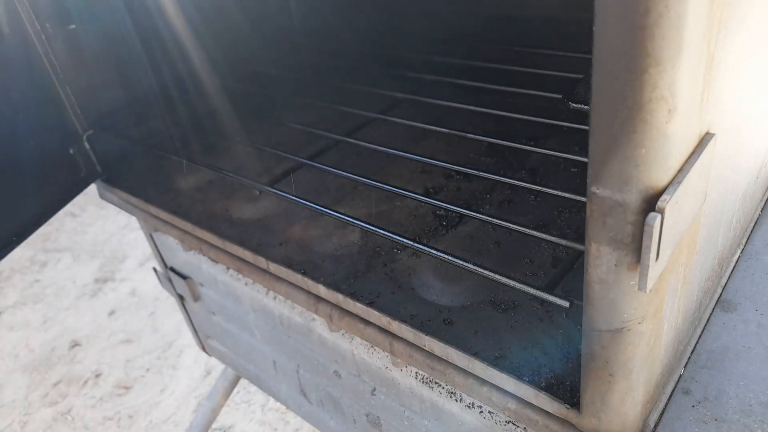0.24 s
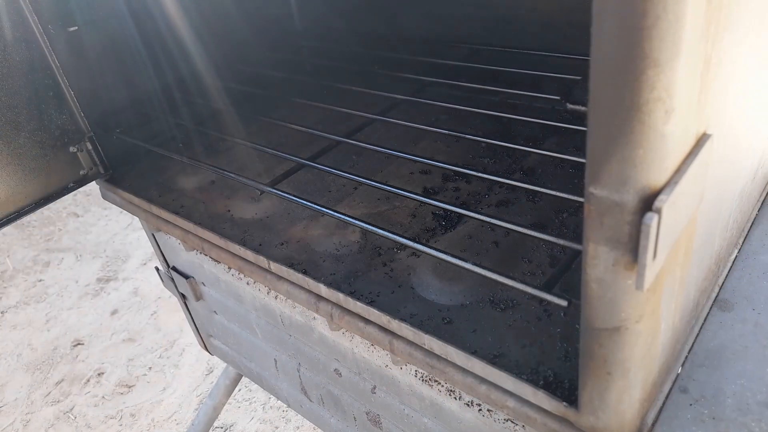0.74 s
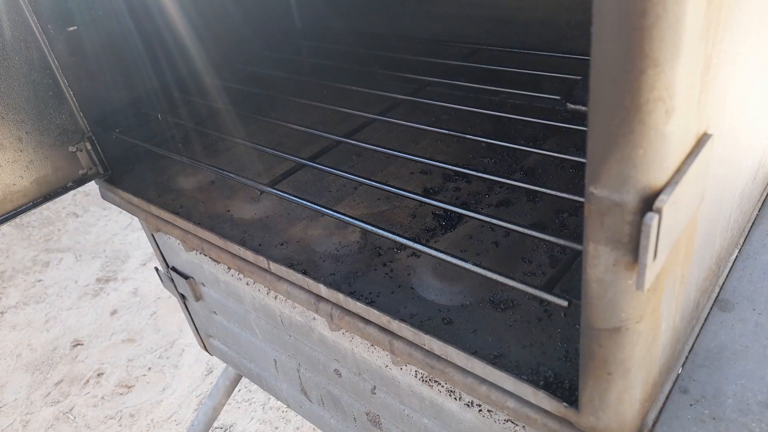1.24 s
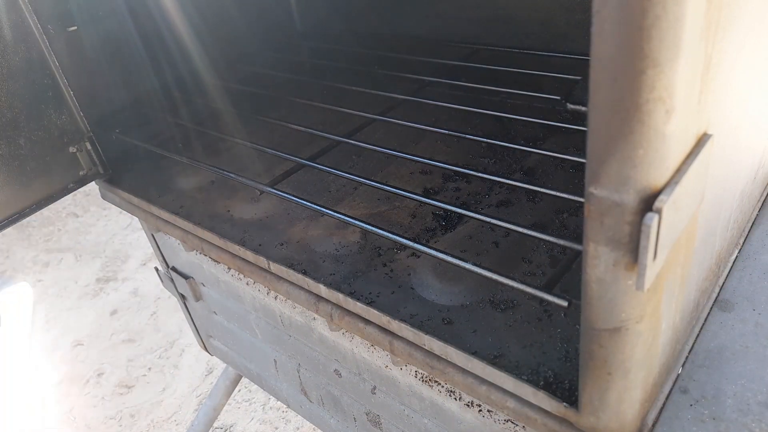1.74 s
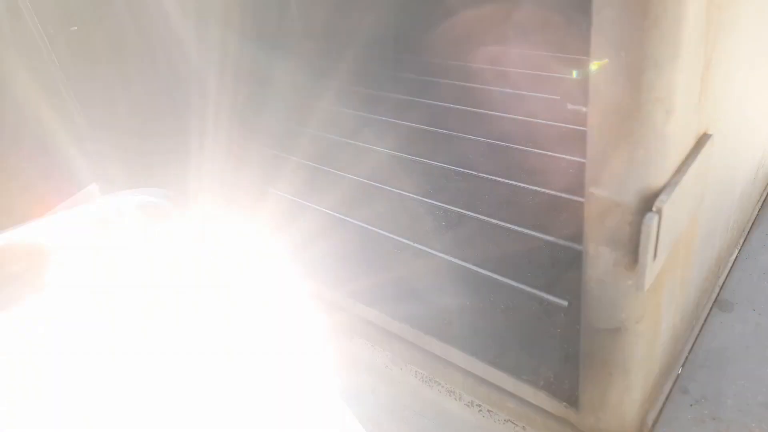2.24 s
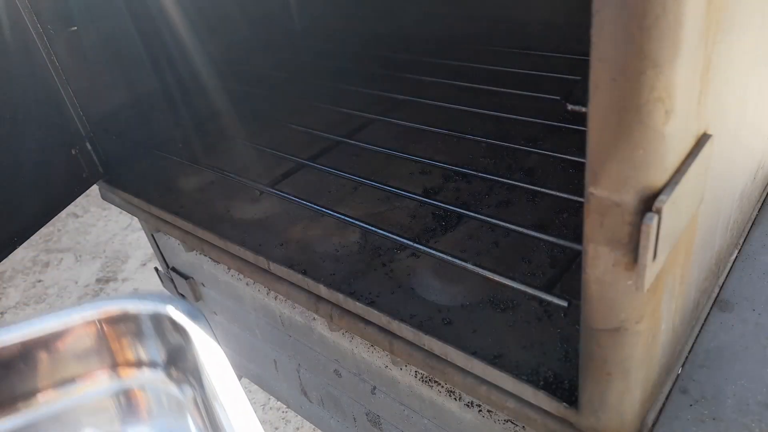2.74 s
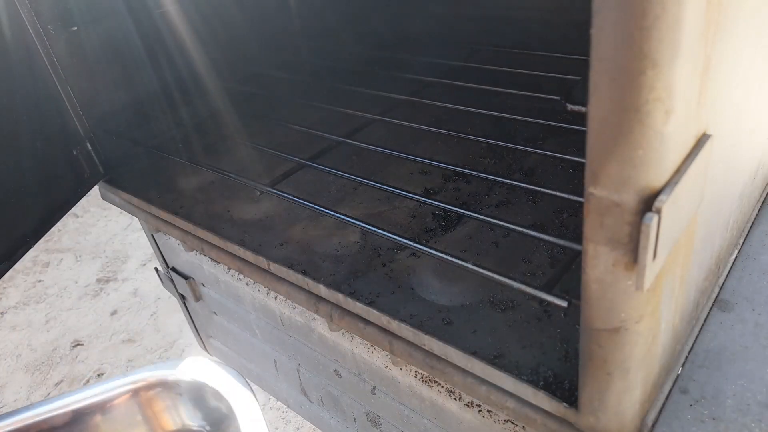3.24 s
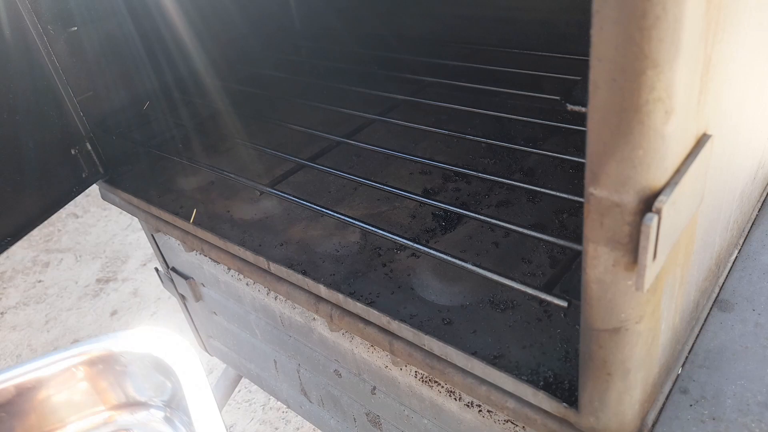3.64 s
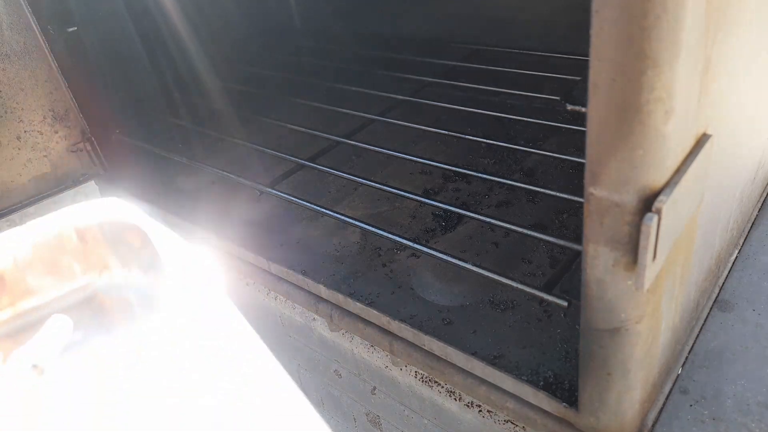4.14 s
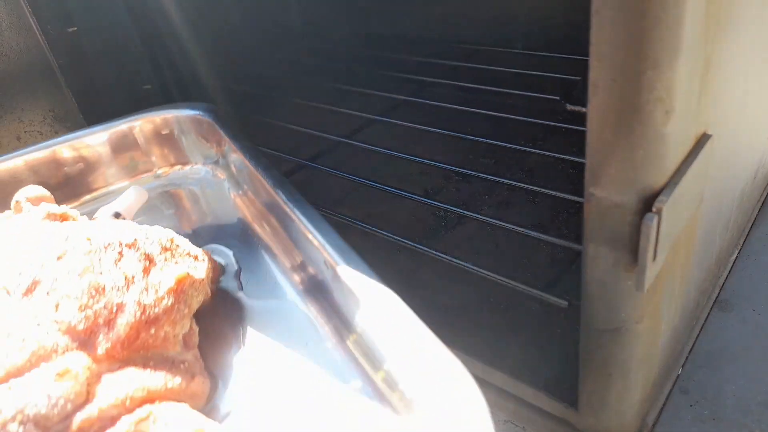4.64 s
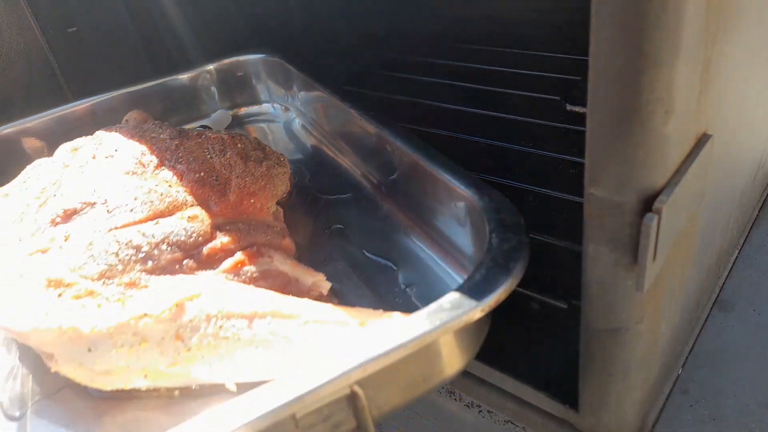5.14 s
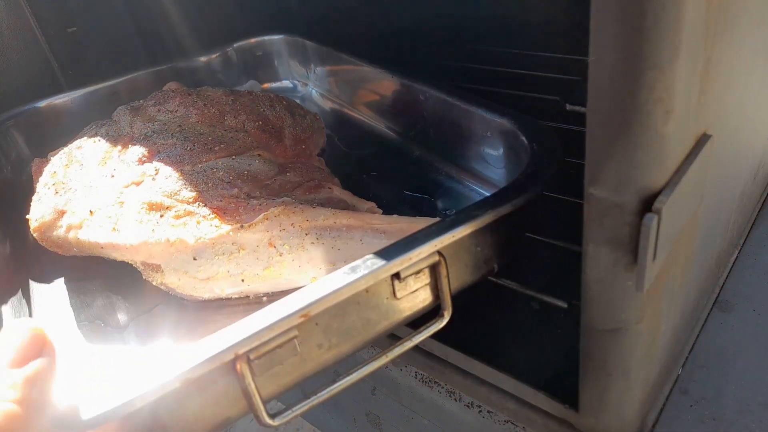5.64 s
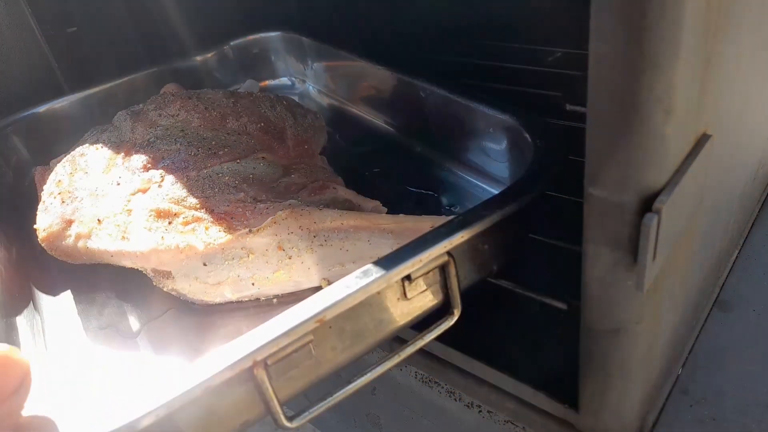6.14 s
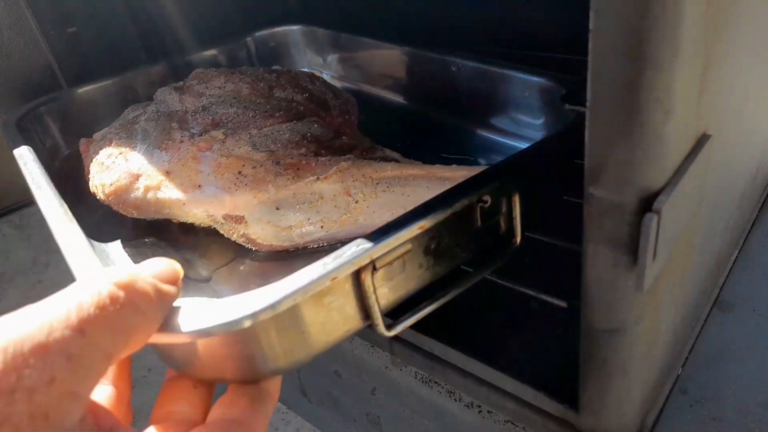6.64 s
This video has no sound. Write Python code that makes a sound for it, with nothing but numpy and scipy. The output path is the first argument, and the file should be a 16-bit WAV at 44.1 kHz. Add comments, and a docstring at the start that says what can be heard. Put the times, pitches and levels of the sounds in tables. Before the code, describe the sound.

Hollow metal knocks, sharp tray clacks and small handle tinks lead to grainy steel scraping and heavy tray bumps in quiet open air.

```python
"""Meat tray into a smoker

Outdoors, a steel tray of meat is carried to a sheet-steel smoker, rubs its way in, lands on the rack and slides.
Knocks, short scrapes, clacks, tinks and landings are ringing modes over bands of noise; wires ring as paired tones.
Rubbing is slipping noise in the tray's resonances; rustles, wind, open air and a far buzz are shaped noise.
Jolts and dull bumps reach the microphone, and a bird whistles in wavering sines some way off."""
import sys
import numpy as np
from scipy import signal
from scipy.fft import irfft, next_fast_len
from scipy.io import wavfile

SR = 44100
rng = np.random.default_rng(int(sys.argv[2]) if len(sys.argv) > 2 else 0)


def generate_wav(signal):
    """Clip the signal to [-1, 1] and save it as 16-bit WAV at the path in sys.argv[1]."""
    frames = np.transpose(np.atleast_2d(signal))
    scaled = np.clip(frames, -1, 1) * 32767
    pcm = np.round(scaled).astype(np.int16)
    wavfile.write(sys.argv[1], SR, pcm)


N = 303408
TIME = np.arange(N) / SR


def amp(db):
    """Decibels to gain."""
    return 10 ** (np.asarray(db) / 20)


def unit(x):
    """Scales to rms 1."""
    return x / np.sqrt(np.mean(x ** 2) + 1e-30)


def read(points, hz, axis=1):
    """One column of a table, interpolated over log frequency."""
    table = np.transpose(points)
    return np.interp(np.log(hz + 1), np.log(table[0]), table[axis])


def add(mix, s, sound):
    """Mixes a stereo sound in at time s."""
    part = mix[:, max(0, round(s * SR)):][:, :sound.shape[1]]
    part += sound[:, :part.shape[1]]


def wander(length, hz):
    """Random motion of rms 1: straight lines between random points, hz points per second."""
    knots = rng.standard_normal(4096)
    return unit(np.interp(np.arange(length) * hz / SR, np.arange(len(knots)), knots, period=len(knots)))


def together(gains):
    """Unrelated noises add in power."""
    return np.sqrt(sum(gain ** 2 for gain in gains))


def swell(s, rise, hold, fall_db_per_s):
    """Gain over time of one movement: grows by 20 dB in the rise time up to s, holds, then fades."""
    early = np.maximum(s - TIME, 0)
    late = np.maximum(TIME - s - hold, 0)
    return amp(np.maximum(-20 * early / abs(rise) - abs(fall_db_per_s) * late, -200))


# Left-over-right level of every source, before its own pan: (frequency [Hz], left minus right [dB])
LEFT_BIAS = [(130, 3), (270, -1), (550, 3), (1200, 3.5), (3000, 3), (12000, 2.5)]


def ports(hz, lag_ms, pan_db=0):
    """Complex gain at the two microphone ports: the right one hears later, by level and pan softer or louder."""
    tilt = amp(read(LEFT_BIAS, hz) + pan_db)
    delay = np.exp(-2j * np.pi * hz * lag_ms * 1e-3)
    return np.array([tilt, delay]) / np.sqrt((1 + tilt ** 2) / 2)


# How alike the two ports hear a noise, before its own factor: (frequency [Hz], correlation [0 to 1])
LIKENESS = [(50, .7), (130, 0.86), (300, 0.96), (700, .92), (2000, 0.41), (15000, 0.31)]


def random_spectrum(length, lag_ms, pan_db=0, alike=1):
    """Frequencies and a white, random-phase spectrum as the two ports hear it."""
    hz = np.fft.rfftfreq(length, 1 / SR)
    a, b = np.exp(2j * np.pi * rng.random((2, len(hz))))
    same = np.clip(alike * read(LIKENESS, hz), 0, 1)
    pair = np.array([a, same * a + np.sqrt(1 - same ** 2) * b])
    return hz, pair * ports(hz, lag_ms, pan_db)


def noise(tone, lag_ms, pan_db=0, alike=1):
    """Steady stereo noise of rms 1 with the given spectrum."""
    length = next_fast_len(N)
    hz, z = random_spectrum(length, lag_ms, pan_db, alike)
    return unit(irfft(z * amp(read(tone, hz)), length)[:, :N])


def envelope(t, hz, t60, rise, contact, build_cycles, snap_db, snap_s):
    """A mode builds over a few cycles, is fed while the contact lasts, then dies away."""
    build = 1 - np.exp(-t / (abs(rise) / 2 + build_cycles / hz[:, None]))
    ringing = build * np.exp(-np.log(1000) * np.maximum(t - contact, 0) / t60[:, None])
    # the first snap comes straight from the point of impact and has little bass
    snap = amp(snap_db) * (1 - np.exp(-t / (abs(rise) / 2 + 1e-5))) * np.exp(-t / snap_s)
    return ringing + snap * (hz / (hz + 250))[:, None]


# Pitches at which a blow's tone is set, boom, body, edge, fizz: (frequency [Hz])
TONE_HZ = [240, 700, 2700, 9600]


def tone_of(shape, db, brightness):
    """Levels of one blow: the harder the contact, the more the tone tilts toward the treble."""
    octaves = np.log2(np.array(TONE_HZ) / TONE_HZ[1])
    return db + np.array(shape) + brightness * octaves


def strike(tone_db, rise, contact, modes, ring, lag_ms, pan_db, build_cycles, snap_db, snap_s,
           ripple_db, chatter_db, size):
    """One blow on steel: clear modes over a dense ring in third octaves, roughened by chatter at the contact."""
    t = np.arange(size) / SR
    tone = list(zip(TONE_HZ, tone_db))
    timing = rise, contact, build_cycles, snap_db, snap_s
    centres = 1000 * 2 ** (np.arange(-10, 13) / 3)
    hz, z = random_spectrum(size, lag_ms, pan_db)

    # the weak modes bunch into peaks and gaps
    ripple = amp(ripple_db * np.clip(wander(len(hz), SR / 14), -2, 2))
    share = ripple * (abs(np.log2((hz + 1) / centres[:, None])) < 1 / 6)
    band_norm = size / np.sqrt(6 * (share ** 2).sum(1))
    bands = irfft(z[:, None] * share, size) * band_norm[:, None]
    shape = envelope(t, centres, read(ring, centres, axis=2), *timing)
    band_gain = amp(read(tone, centres) + read(ring, centres))
    crowd = np.einsum("cbt,bt->ct", bands, shape * band_gain[:, None])
    crowd *= unit(amp(chatter_db * wander(size, 700)))

    mode_hz, mode_db, t60 = np.transpose(modes)
    # where the blow lands decides how strongly each mode answers
    spread_db = rng.uniform(-2, 2, len(modes))
    height = np.sqrt(2) * amp(read(tone, mode_hz) + mode_db + spread_db)
    turn = np.exp(2j * np.pi * (mode_hz[:, None] * t + rng.random((len(modes), 1))))
    clear = (ports(mode_hz, lag_ms, pan_db) * height) @ (turn * envelope(t, mode_hz, t60, *timing))
    return crowd + clear.real


# Knocks on the cabinet, and two short scrapes that build slowly (at 0.904 and 1.128 s):
# (time [s], relative level [dB], brightness [dB/octave], rise [s], contact [s])
CABINET_CONTACTS = [(0, -49.5, -3, 0.00095, 0.02), (.205, -67, -8, 0.0037, 0.014),
                    (.338, -53.5, -1.5, 0.0021, 0.015), (.365, -57, -3.5, 0.0018, 0.01),
                    (0.904, -58, -4, 0.041, 0.076), (1.128, -57, -4, 0.023, 0.085),
                    (1.369, -40.5, -0.5, 0.012, 0.0074), (2.087, -43.5, -0.76, 0.017, 0.012),
                    (2.587, -44, -0.4, 0.004, 0.024), (2.656, -45.5, 0.3, 0.0013, 0.012),
                    (3.038, -36.5, -3.5, .0009, 0.015), (3.159, -42, -1.3, .0012, 0.036),
                    (3.558, -66.5, -9.5, .0066, .02), (4.857, -50.5, -6.5, .0054, 0.025)]
# The tone the box gives a contact at boom, body, edge, fizz: (relative level [dB])
CABINET_TONE = [0, 0.00093, 0.97, -1.6]
# Modes that stand out of the box's ring: (frequency [Hz], level against the contact's tone [dB], t60 [s])
CABINET_MODES = [(122.8, -5.5, 0.57), (180.6, -4, 0.2), (207.6, -3, 0.1), (267.8, 0, 0.16), (324, -2, .4),
                 (344, -9.5, 0.15), (427.4, -11.5, 0.19), (459, -15, 0.83), (487.6, -7.5, 0.36),
                 (622, -16.5, 0.29), (698, -13, 0.51), (764, -11, 0.27), (832, -9, 0.65),
                 (1126, -10.5, 0.35), (1350, -17, .25), (1840, -16, 0.2), (1914, -14, 0.12),
                 (2100, -15.5, 0.35)]
# Its crowd of weaker modes: (frequency [Hz], level against the contact's tone [dB], t60 [s])
CABINET_RING = [(101, -14, 0.72), (190, -1, 0.71), (400, -3, 0.48), (544, -7.5, 0.47), (770, -2, 0.43),
                (1400, -2.5, 0.32), (2430, -3.5, 0.25), (5370, -3, 0.17), (8450, -8, 0.14),
                (15000, -22, 0.48)]


def cabinet():
    """The big sheet-steel box booms under knocks and short scrapes; its bass takes some milliseconds to build."""
    out = np.zeros((2, N))
    for s, db, brightness, rise, contact in CABINET_CONTACTS:
        tone_db = tone_of(CABINET_TONE, db, brightness)
        boom = strike(tone_db, rise, contact, CABINET_MODES, CABINET_RING, lag_ms=0.35, pan_db=0,
                      build_cycles=5.4, snap_db=-2, snap_s=0.011, ripple_db=4.5, chatter_db=0.0, size=32768)
        add(out, s, boom)
    return amp(-0.18) * out


# Rack wires and panels left singing by a knock, and one short scrape squeak (at 3.163 s):
# (time [s], frequency [Hz], level before its twin [dB], t60 [s])
SINGING_STEEL = [(0, 246.5, -35.5, 0.18), (0, 1440, -55, 0.57), (0, 2320, -65, 0.63), (1.37, 885, -70, .5),
                 (1.37, 2113, -44, 0.14), (1.372, 4380, -33, 0.061), (1.368, 5470, -34, 0.053),
                 (2.092, 881, -50, 0.99), (2.091, 1132, -47.5, 0.28), (2.092, 2170, -74, 1.1),
                 (2.587, 895, -52, 0.64), (3.04, 1089, -33.5, 0.13), (3.045, 211.6, -30.5, 0.62),
                 (3.163, 3160, -43, 0.25), (3.268, 482, -47.5, 0.45)]


def wires():
    """Each rings as a dying tone with a weak twin a few Hz away, so that it fades unevenly."""
    out = np.zeros((2, N))
    t = np.arange(int(1.5 * SR)) / SR
    for s, hz, db, t60 in SINGING_STEEL:
        twin = 1 + .25 * np.exp(2j * np.pi * (rng.uniform(5, 12) * t + rng.random()))
        decay = amp(db - 60 * t / t60) * (1 - np.exp(-t / 0.0042))
        tone = decay * np.exp(2j * np.pi * (hz * t + rng.random())) * twin
        add(out, s, np.sqrt(2) * (ports(hz, lag_ms=0.1)[:, None] * tone).real)
    return out


# Gusts at the microphone: (time at full strength [s], rise by 20 dB [s], hold [s], level before lumps [dB])
GUSTS = [(0, .1, 0.33, -51), (.93, 0.074, .04, -66), (2.359, .04, .02, -51), (3.7, .1, .35, -60.5),
         (4.899, 0.37, 0.7, -56.5), (5.818, 0.092, 0.34, -58.5), (6.099, 0.14, .6, -52.5)]
# Spectrum of the wind and jolts: (frequency [Hz], relative level [dB])
WIND_TONE = [(15, -37.5), (30, -19.5), (60, 0.5), (100, -1.5), (140, -14), (250, -25), (600, -53.5),
             (2000, -92)]
GUST_FALL_DB_PER_S, CALM_DB = 130.5, -75
LUMP_DB, LUMPS_PER_S = 3, 12
# each cabinet contact and landing also jolts the microphone, a low thump this far below and behind the blow
JOLT_DB, JOLT_DELAY_S = -11.5, 0.027
JOLT_RISE_S, JOLT_HOLD_S, JOLT_FALL_DB_PER_S = .035, .014, 130


def wind_and_jolts():
    """Lumpy wind, and the microphone jolted by each contact and landing: low noise, stronger at the left port."""
    gusts = [amp(db) * swell(s, rise, hold, GUST_FALL_DB_PER_S) for s, rise, hold, db in GUSTS]
    lumps = unit(amp(LUMP_DB * wander(N, LUMPS_PER_S)))
    breeze = together(gusts + [amp(CALM_DB)]) * lumps
    jolts = [amp(db + JOLT_DB) * swell(s + JOLT_DELAY_S, JOLT_RISE_S, JOLT_HOLD_S, JOLT_FALL_DB_PER_S)
             for s, db, *_ in CABINET_CONTACTS + RACK_LANDINGS]
    return together([breeze] + jolts) * noise(WIND_TONE, lag_ms=.1, pan_db=7, alike=0.65)


# Spectrum of the quiet open air: (frequency [Hz], relative level [dB])
AIR_TONE = [(35, -23.5), (60, 1.5), (231, -3), (335, 2.5), (521, -9.5), (1200, -22.5), (2150, -15.5),
            (3580, -26), (4960, -21), (7540, -24.5), (15500, -25)]
AIR_DB = -70.5


def open_air():
    """The quiet outdoors as a steady, wide bed of noise."""
    return amp(AIR_DB) * noise(AIR_TONE, lag_ms=0.055, pan_db=0.5, alike=0.3)


# Hands and sleeves shift: (time at full strength [s], rise by 20 dB [s], hold [s], relative level [dB])
HAND_MOVES = [(0.063, 0.22, 0.23, -64.5), (0.996, .3, 1.5, -75), (3.466, 0.58, 0.036, -76),
              (3.95, .4, 0.47, -73), (5.616, 0.22, 0.13, -68.5), (6.062, 0.29, 0.41, -69.5)]
# Spectrum of the rustle: (frequency [Hz], relative level [dB])
RUSTLE_TONE = [(1500, -4), (3500, -7), (5400, -2), (7000, -4.5), (10000, -3.5), (13000, -0.5),
               (15500, -3.5)]
RUSTLE_FALL_DB_PER_S = 41.5


def rustle(hiss_gain):
    """Fine, crinkly hiss of hands, sleeves and the sliding tray: bright noise with a fast grain."""
    hands = [amp(db) * swell(s, rise, hold, RUSTLE_FALL_DB_PER_S) for s, rise, hold, db in HAND_MOVES]
    grain = unit(amp(0.61 * wander(N, 900) + 0.28 * wander(N, 40)))
    hiss = noise(RUSTLE_TONE, lag_ms=0.18, pan_db=1.0, alike=0.36)
    return amp(5.5) * together(hands + [hiss_gain]) * hiss * grain


# Short metal clacks of the tray and its wire handles; the rows at 3.039 and 3.158 s add the bright snap of the
# cabinet knocks there: (time [s], relative level [dB], brightness [dB/octave], relative left-right pan [dB])
TRAY_CLACKS = [(.075, -67.5, 3, 0), (1.011, -48.5, -2, 6), (1.37, -45, 0, 19), (1.737, -52.5, -11.5, 5),
               (2.3517, -28.5, 2.83, 6.5), (2.463, -65, 1.4, -6), (2.641, -36, -5, 5),
               (2.783, -35.5, -3.5, 4.5), (3.039, -54, 1.5, 2), (3.158, -50, 1.5, 1), (3.268, -36, -4.6, 1),
               (3.645, -57.5, -0.7, 1), (4.444, -75.5, 3.5, -6), (4.716, -47.5, -1.5, 3),
               (5.059, -45.5, -1, 6), (5.14, -31, -1.5, 6), (5.266, -45.5, -1, 4), (5.435, -38.5, -3.5, 5),
               (6.098, -57, 4, 5.5), (6.188, -86, 6.5, 13), (6.623, -42.5, -0.3, 3), (6.667, -53, 0.5, 5),
               (6.803, -42.5, -6.5, 3)]
# The tone the tray gives a blow at boom, body, edge, fizz: (relative level [dB])
TRAY_TONE = [-18, -1.5, 2.5, -3]
# Modes that stand out of the tray's ring: (frequency [Hz], level against the blow's tone [dB], t60 [s])
TRAY_MODES = [(616, 9, 0.025), (745, 1.5, 0.0256), (894, -5.5, 0.18), (1211, -4, 0.11), (1402, -4, .11),
              (1576, -0.5, 0.1), (2032, -11.5, 0.056), (2422, -8, 0.063), (2532, -10, 0.039),
              (2970, -7.5, 0.086), (3830, -18.5, 0.22), (4993, -1, 0.067), (5780, -10, 0.059),
              (7200, -12.5, 0.017), (8556, -8.5, 0.071), (9860, -17, 0.031), (12250, -13.5, .05),
              (13500, -12.5, 0.054)]
# Its crowd of weaker modes: (frequency [Hz], level against the blow's tone [dB], t60 [s])
TRAY_RING = [(99.6, -6.5, 0.073), (300, 1, 0.4), (433, -2.5, 0.28), (650, 0, 0.065), (900, -1, 0.23),
             (1150, 1, 0.12), (1560, 1, 0.11), (2800, 2, 0.084), (3770, -4, 0.11), (5160, 7, 0.051),
             (8150, 1, 0.08), (13000, 6.5, 0.04), (16330, -0.5, .05)]


def clacks():
    """Hard, quickly damped hits; each leaves a faint ring in the open cabinet."""
    hits = np.zeros((2, N))
    for s, db, brightness, pan_db in TRAY_CLACKS:
        tone_db = tone_of(TRAY_TONE, db, brightness)
        lag_ms = np.interp(s, [5.3, 6.0], [.33, .12])  # the tray moves toward the middle
        hit = strike(tone_db, .0016, 0.0018, TRAY_MODES, TRAY_RING, lag_ms=lag_ms, pan_db=pan_db - 2.0,
                     build_cycles=1.0, snap_db=1, snap_s=0.0034, ripple_db=4.5, chatter_db=1.5, size=8192)
        add(hits, s, hit)
    # the cabinet's hollow: dulled noise that dies by 60 dB in 0.33 s
    t = np.arange(SR // 2) / SR
    dull = signal.lfilter(*signal.butter(1, 1500, fs=SR), rng.standard_normal((2, len(t))))
    hollow = dull * amp(-60 * t / 0.33)
    echo = signal.oaconvolve(hits, hollow / np.linalg.norm(hollow[0]), axes=1)[:, :N]
    return amp(-4.0) * (hits + amp(-36.5) * echo)


# Dull, very low bumps at the microphone: (time at the middle [s], level [dB])
MIC_BUMPS = [(.235, -48), (0.474, -45), (1.26, -53), (2.361, -40), (3.675, -50), (3.785, -42), (3.9, -51.5),
             (3.995, -46.5), (4.08, -53), (5.412, -33), (6.21, -43), (6.868, -31)]
BUMP_HZ, BUMP_WIDTH_S = 86, 0.0094  # the pitch is a centre: each bump strays by up to 15 %


def bumps():
    """Each is a cycle or two of low pressure, mostly at the left port."""
    out = np.zeros((2, N))
    t = np.arange(-SR // 10, SR // 10) / SR
    bell = 1 / np.cosh(t / BUMP_WIDTH_S * np.sqrt(2))
    for s, db in MIC_BUMPS:
        hz = BUMP_HZ * rng.uniform(.85, 1.15)
        wave = np.exp(2j * np.pi * (hz * t + rng.random())) * bell
        add(out, s + t[0], np.sqrt(2) * amp(db) * (ports(hz, lag_ms=.1, pan_db=8)[:, None] * wave).real)
    return out


BUZZ_S, BUZZ_RISE_S, BUZZ_HOLD_S, BUZZ_FALL_DB_PER_S = 0.43, .3, 2.1, 60
BUZZ_DB, BUZZ_HZ = -85, 5170
BUZZ_FILTER_WIDTH_HZ = 450  # of each of two passes


def insect():
    """A far, thin buzz, perhaps an insect: a narrow band of hiss that swells, holds and fades."""
    b, a = signal.iirpeak(BUZZ_HZ, BUZZ_HZ / BUZZ_FILTER_WIDTH_HZ, fs=SR)
    band = signal.lfilter(b, a, signal.lfilter(b, a, rng.standard_normal((2, N))))
    return amp(BUZZ_DB) * swell(BUZZ_S, BUZZ_RISE_S, BUZZ_HOLD_S, BUZZ_FALL_DB_PER_S) * unit(band)


def whistle(t, hz, db):
    """A near-pure bird note, slightly wavering in pitch and level."""
    phase = 2 * np.pi * np.cumsum(hz * (1 + 0.0113 * wander(len(t), 250))) / SR
    level = np.sqrt(2) * amp(db + 1.6 * wander(len(t), 82))
    return level * np.sin(phase) * np.ones((2, 1))


# The bird's falling whistles, all over the same range: (time [s], length [s], relative level [dB])
SLURS = [(2.01, 0.01, -63), (2.658, 0.11, -72), (3.027, 0.17, -71), (3.373, 0.18, -74), (3.782, .16, -71),
         (4.186, 0.19, -76)]
# Pitch of its thin held note, before the waver: (time [s], frequency [Hz])
HELD_NOTE = [(3.88, 8100), (3.918, 8120), (4.056, 8100), (4.084, 8140), (4.138, 7996), (4.196, 8740),
             (4.222, 8200), (4.33, 7500)]
SLUR_FROM_HZ, SLUR_TO_HZ = 6530, 4450
HELD_START_DB, HELD_FADE_DB_PER_S = -67, 10.5  # relative, like the slurs
YARD_DB = -6


def bird():
    """Falling slurs and one high held note, scattered by the yard as a tail of decaying noise."""
    notes = np.zeros((2, N))
    for s, length, db in SLURS:
        t = np.arange(0, length, 1 / SR)
        slur = whistle(t, np.linspace(SLUR_FROM_HZ, SLUR_TO_HZ, len(t)), db)
        add(notes, s, slur * signal.windows.tukey(len(t), .25))
    s, hz = np.transpose(HELD_NOTE)
    t = np.arange(s[0], s[-1], 1 / SR)
    held = whistle(t, np.interp(t, s, hz), HELD_START_DB - HELD_FADE_DB_PER_S * (t - s[0]))
    add(notes, s[0], held * signal.windows.tukey(len(t), .25))
    t = np.arange(SR // 4) / SR
    yard = rng.standard_normal((2, len(t))) * amp(-60 * t / 0.38)
    scattered = signal.oaconvolve(notes, yard / np.linalg.norm(yard[0]), axes=1)[:, :N]
    return amp(-1.5) * notes + amp(YARD_DB) * scattered


# Pushes of the tray, steel on steel: (time at full pressure [s], rise by 20 dB [s], hold [s],
# relative drumming level [dB], relative rasp level [dB], relative hiss level [dB])
PUSHES = [(2.675, 0.23, 0.031, -42, -78, -62.5), (4.26, 0.17, 0.024, -56, -68, -67),
          (4.321, 0.014, 0.0042, -56, -59.5, -59.5), (4.996, 0.11, 0.58, -50.5, -52, -57.5),
          (5.294, 0.053, 0.1, -34, -47.5, -54), (6.558, 0.27, 0.29, -43, -54, -56),
          (6.707, 0.069, 0.0079, -30.5, -54.5, -70)]
RUB_FALL_DB_PER_S = 163


def pushes():
    """Gains over time of the drumming, rasp and hiss: all three follow the pressure of each push."""
    return together(amp(dbs)[:, None] * swell(s, rise, hold, RUB_FALL_DB_PER_S)
                    for s, rise, hold, *dbs in PUSHES)


CATCHES_PER_S = 100  # on average


def catches():
    """Gain over time: burrs snag at random moments, and each release dies in a few milliseconds."""
    strength = amp(4 * np.minimum(rng.exponential(1, N), 3))
    snags = (rng.random(N) < CATCHES_PER_S / SR) * strength
    return unit(signal.lfilter([1], [1, -np.exp(-1 / (0.0055 * SR))], snags))


# Spectrum of the tray's drumming floor: (frequency [Hz], relative level [dB])
DRUM_TONE = [(53, -44), (90, -2), (140, -23), (193, 7.5), (237, -12), (275, 6), (368, -8.5), (487, -9),
             (520, -22.5), (680, -51), (1140, -120)]
# Spectrum of the rasp: (frequency [Hz], relative level [dB])
RASP_TONE = [(250, -3.5), (420, 2.5), (490, -1.5), (543, -23.5), (684, -3.5), (818, 1), (967, -9),
             (1640, -7.5), (1840, -19), (2400, -10.5), (6200, -18.5), (7620, -45.5), (9000, -30),
             (11700, -59), (19800, -120)]
# Resonances of the rubbed tray: (frequency [Hz], width [Hz], relative level [dB])
RUB_PEAKS = [(650, 23, 5), (1260, 64, 4), (1735, 40, 10), (2060, 260, 13), (2800, 35, 1), (3225, 71, 7.5),
             (6940, 120, -2.5)]
SLIP_GRAIN_DB, SLIP_SURGE_DB = 2.1, 1.4  # unevenness of the slip: fast grain and slow surges
CATCH_DB = -8  # against the slip


def rubbing(drum_gain, rasp_gain):
    """Sliding steel sticks and slips: a grainy rasp in the tray's resonances, its floor drumming underneath."""
    drum = drum_gain * noise(DRUM_TONE, lag_ms=0.38)
    slip = unit(amp(SLIP_GRAIN_DB * wander(N, 600) + SLIP_SURGE_DB * wander(N, 42)))
    stick_slip = unit(slip + amp(CATCH_DB) * catches())
    rasp = rasp_gain * noise(RASP_TONE, lag_ms=0.2) * stick_slip
    singing = sum(amp(db) * signal.lfilter(*signal.iirpeak(hz, hz / width, fs=SR), rasp)
                  for hz, width, db in RUB_PEAKS)
    return amp(-5.5) * drum + amp(4.0) * (rasp + amp(-5.5) * singing)


# Taps of a loose handle rocking to rest: (time [s], relative level [dB])
HANDLE_TAPS = [(3.647, -56), (3.729, -62.5), (3.801, -58.5), (3.866, -60.5), (3.894, -59.5), (3.932, -67.5)]
# The handle's tone at boom, body, edge, fizz: (relative level [dB])
HANDLE_TONE = [4, -7, -9, -21]
# The handle's clear modes: (frequency [Hz], level against the tap's tone [dB], t60 [s])
HANDLE_MODES = [(818, 6.5, 0.083), (916, 10.5, 0.15), (2300, -4, 0.18), (2860, -5, 0.081),
                (3010, -4, 0.052)]


def tinks():
    """A wire handle taps against its bracket, closer together toward the end, off to the left."""
    out = np.zeros((2, N))
    for s, db in HANDLE_TAPS:
        tap = strike(db + np.array(HANDLE_TONE), 0.0009, 0.0017, HANDLE_MODES, TRAY_RING, lag_ms=0.28, pan_db=2.5,
                     build_cycles=0.42, snap_db=-16, snap_s=0.003, ripple_db=5.0, chatter_db=2.0, size=8192)
        add(out, s, tap)
    return amp(-0.5) * out


# The tray bumps on the rack:
# (time [s], relative level [dB], brightness [dB/octave], rise [s], contact [s])
RACK_LANDINGS = [(6.325, -57, -6, 0.0017, .055), (6.364, -33.5, -3, 0.0069, 0.024),
                 (6.512, -32.5, -3.5, 0.0025, 0.0075), (6.802, -49.5, -2.5, 0.0037, 0.014)]
# The tone the rack gives a blow at boom, body, edge, fizz: (relative level [dB])
RACK_TONE = [0.71, -1.8, 0.15, -0.38]
# Modes that stand out of the rack's ring: (frequency [Hz], level against the blow's tone [dB], t60 [s])
RACK_MODES = [(195.9, 2, 0.24), (209, -10, 0.13), (303, -1.5, 0.25), (426, -26, 0.46), (556, -34, 0.52),
              (738, -10, 0.43), (950, -32, 0.17), (1270, -9, 0.16), (1620, -15, 0.16), (1766, -14, 0.47),
              (2610, -34, .14)]
# Its crowd of weaker modes: (frequency [Hz], level against the blow's tone [dB], t60 [s])
RACK_RING = [(102, -30, 0.13), (194, 0, 0.3), (316, -1, 0.59), (496, -3, 0.32), (670, 1, 0.36),
             (1600, 1, 0.23), (3170, 2.5, 0.16), (5570, -0.5, 0.16), (7700, -6.5, 0.077),
             (14800, 3.5, 0.037)]


def landings():
    """The loaded tray bumps on the wire rack, nearly straight ahead."""
    out = np.zeros((2, N))
    for s, db, brightness, rise, contact in RACK_LANDINGS:
        tone_db = tone_of(RACK_TONE, db, brightness)
        bump = strike(tone_db, rise, contact, RACK_MODES, RACK_RING, lag_ms=0.098, pan_db=2.0,
                      build_cycles=1.0, snap_db=7.5, snap_s=0.0044, ripple_db=1.5, chatter_db=-0.5, size=24576)
        add(out, s, bump)
    return amp(0.25) * out


def scene():
    """All sources at the microphone."""
    drum_gain, rasp_gain, hiss_gain = pushes()
    contacts = cabinet() + wires() + clacks() + tinks() + landings()
    friction = rustle(hiss_gain) + rubbing(drum_gain, rasp_gain)
    surroundings = wind_and_jolts() + open_air() + bumps() + insect() + bird()
    return contacts + friction + surroundings


def record(dry):
    """The recorder's band limit: a steep low-pass at 16 kHz."""
    lowpass = signal.firwin(401, 16000, window=("kaiser", 8), fs=SR)
    return signal.oaconvolve(dry, lowpass[None], "same")


dry = scene()
out = record(dry)
generate_wav(out)
```